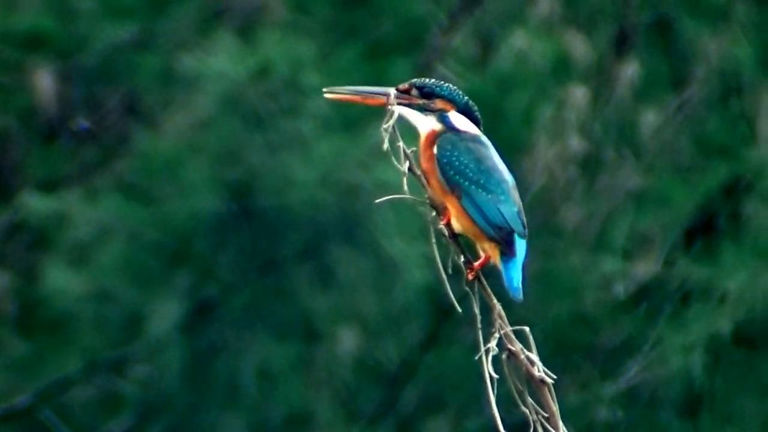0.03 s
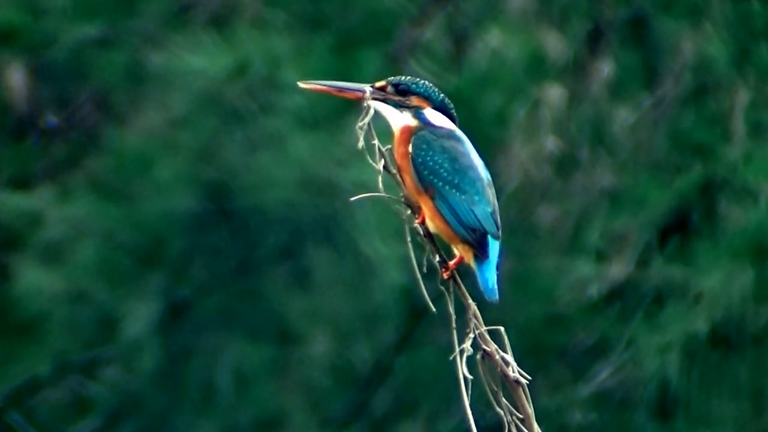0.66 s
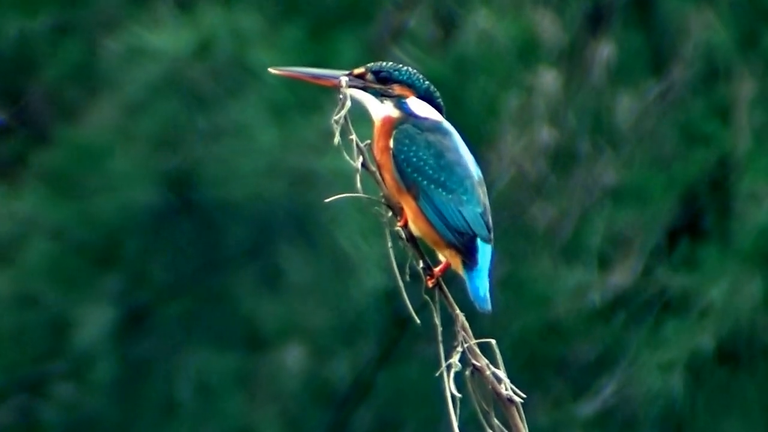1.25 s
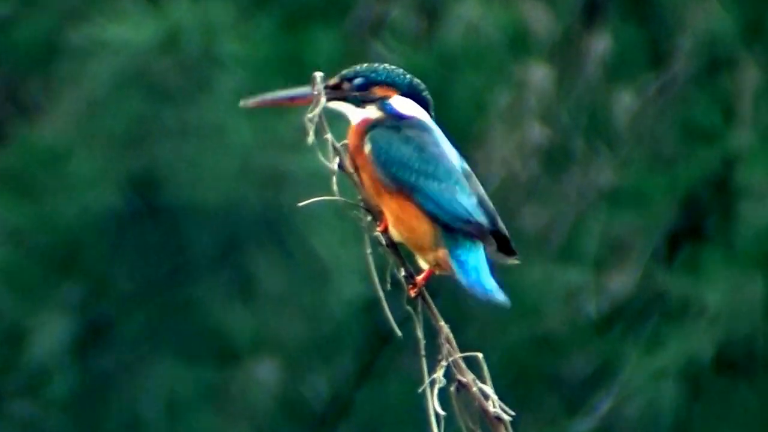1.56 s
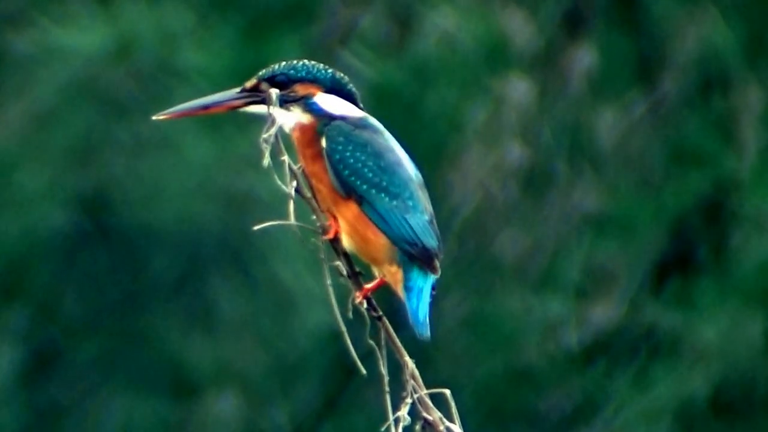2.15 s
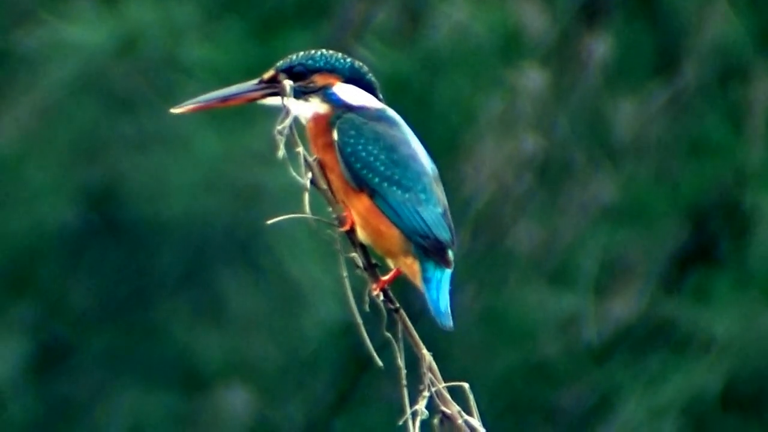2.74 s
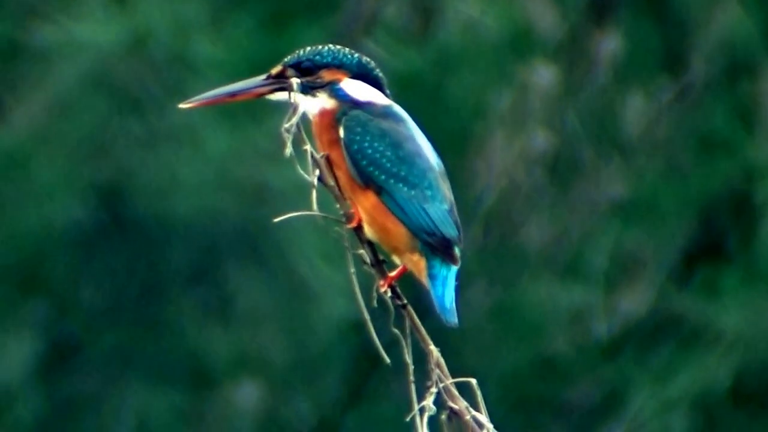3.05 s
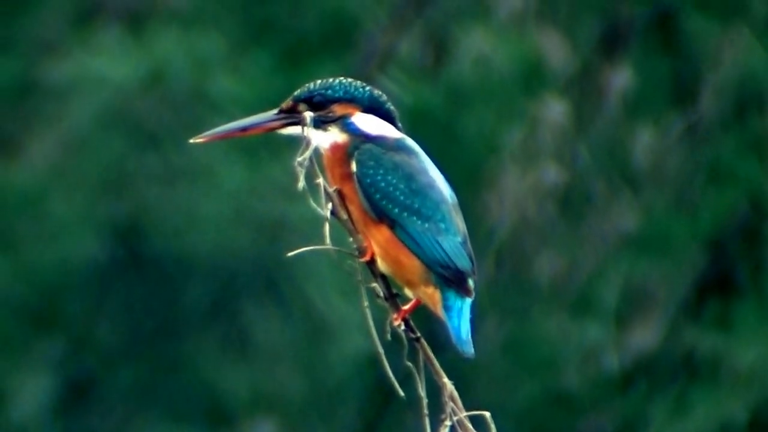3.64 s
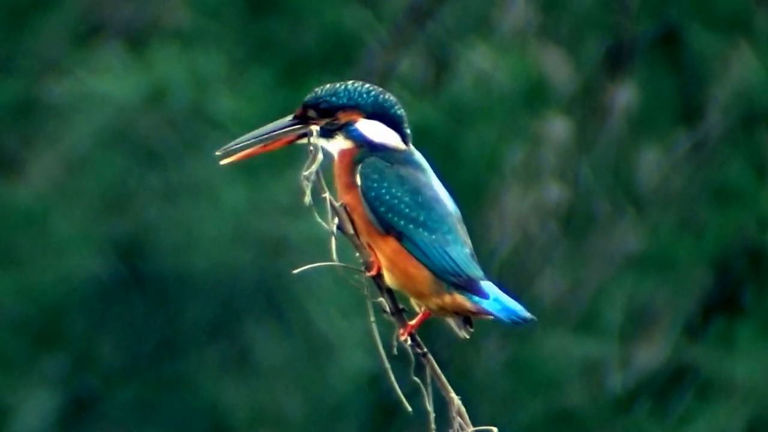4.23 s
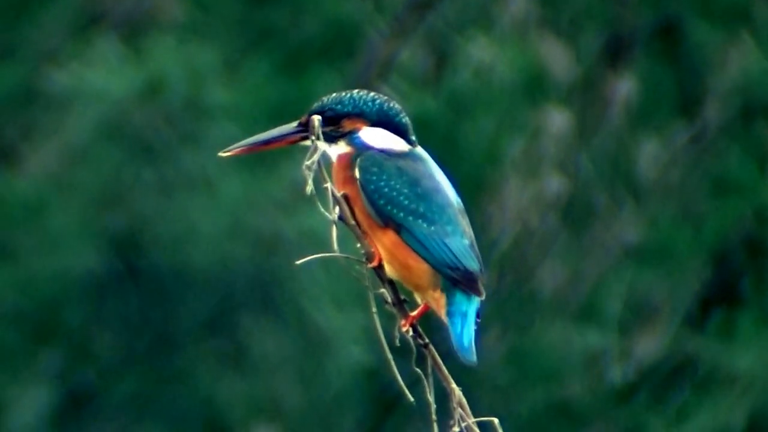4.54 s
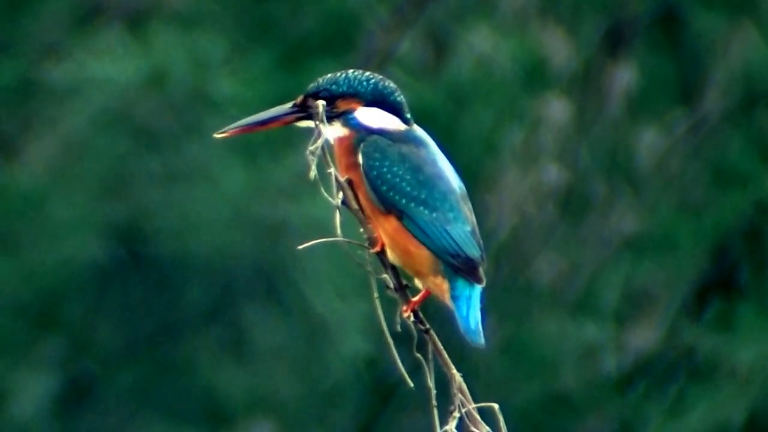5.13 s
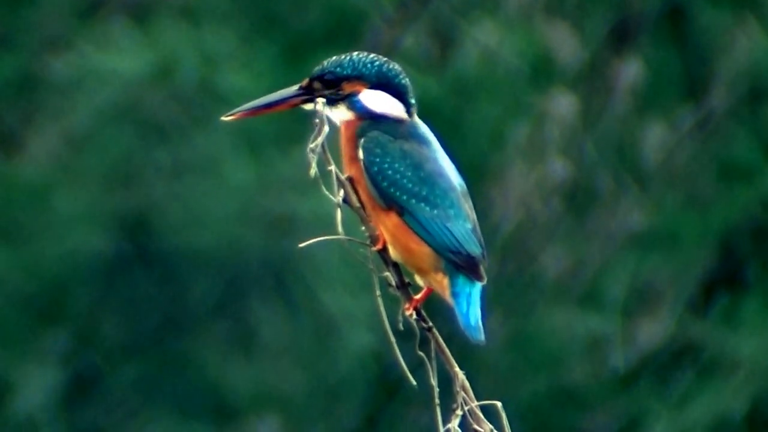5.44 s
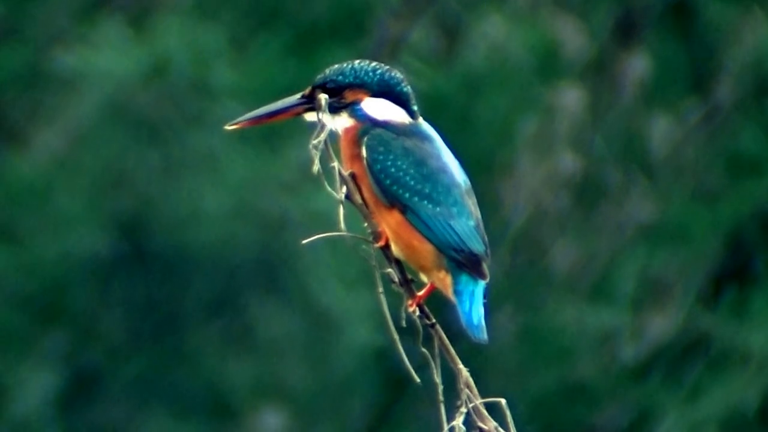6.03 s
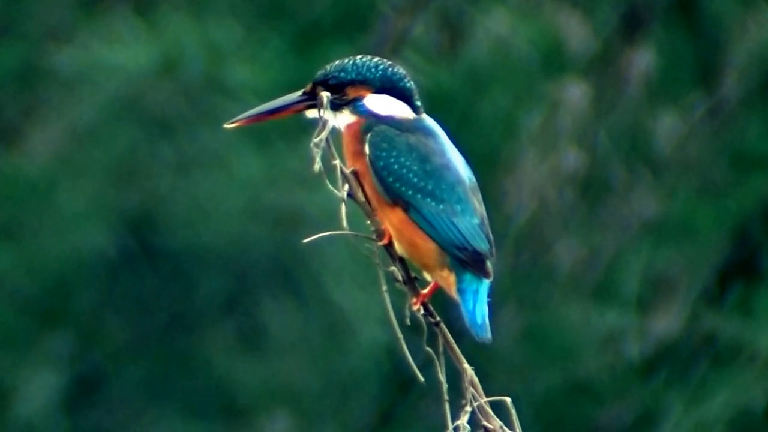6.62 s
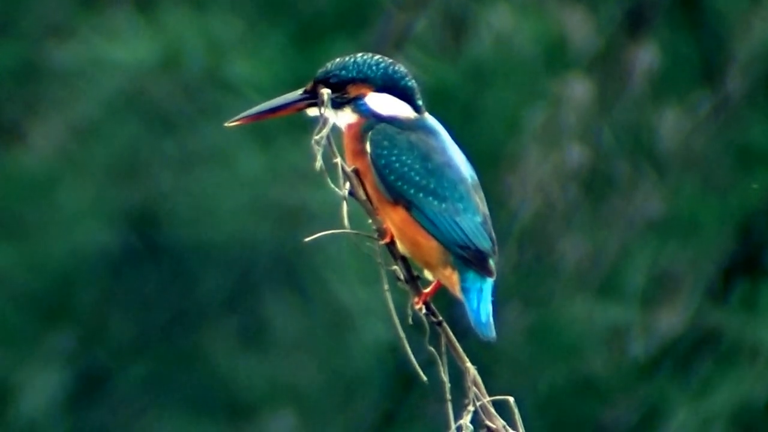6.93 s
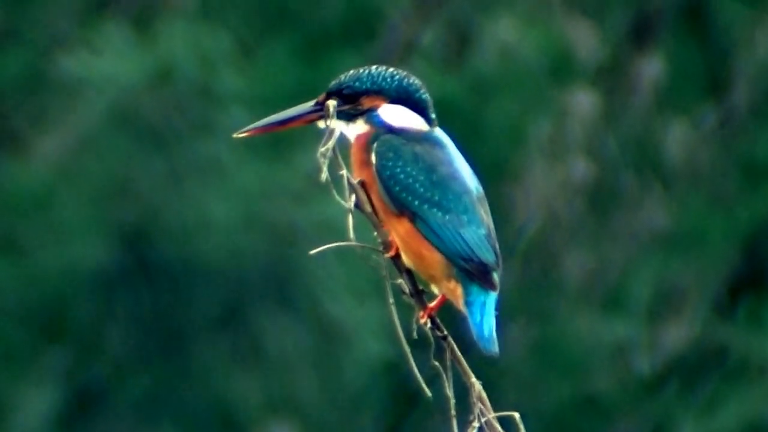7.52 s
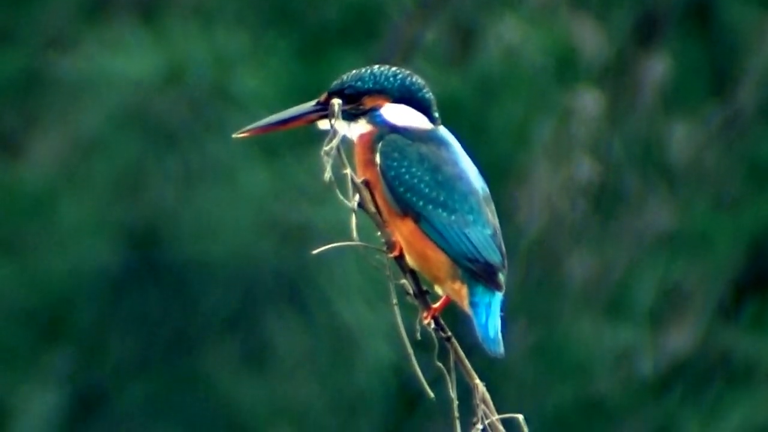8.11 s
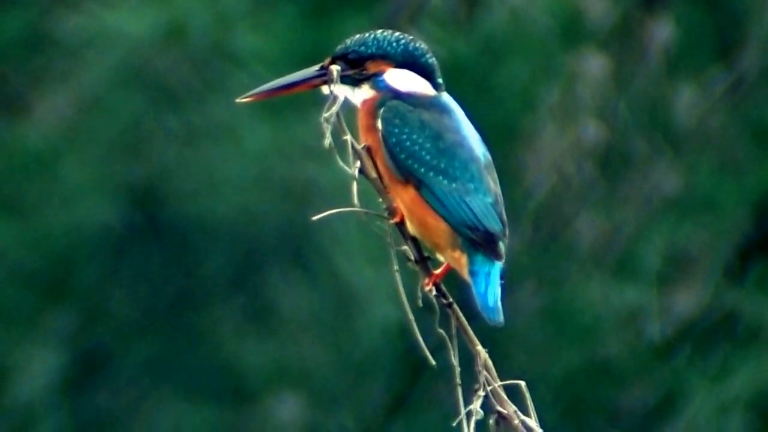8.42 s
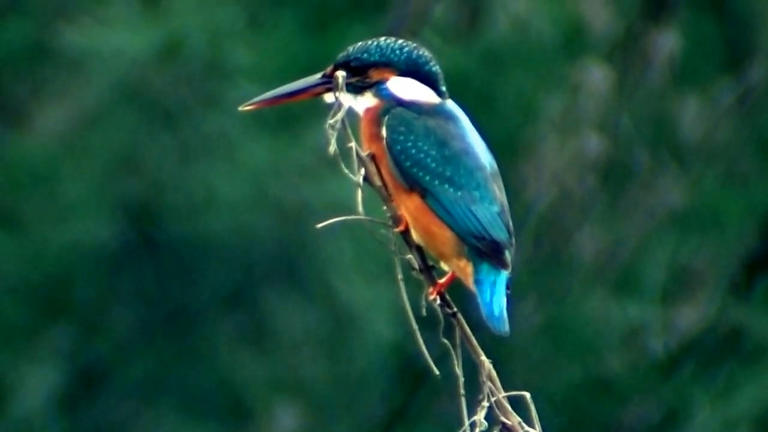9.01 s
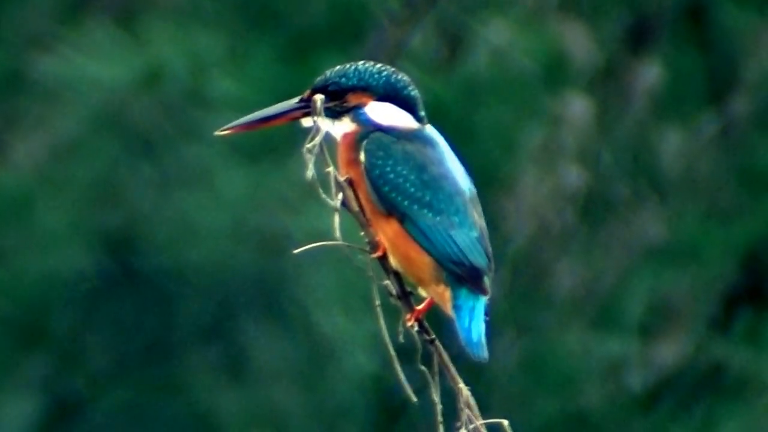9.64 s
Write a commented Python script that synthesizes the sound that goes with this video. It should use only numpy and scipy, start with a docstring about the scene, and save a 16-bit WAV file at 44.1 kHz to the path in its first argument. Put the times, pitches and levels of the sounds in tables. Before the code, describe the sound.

Outdoors at a wetland, a nearby kingfisher gives six short, shrill whistles, each falling in pitch. A second water bird pips in quick reedy pairs, and both echo off the far bank. The pips swell, then sink in pitch and die out after the last whistle. Faint distant chirps and a thin insect buzz remain, with a soft rustle near the end. Far traffic and machines hum quietly throughout.

```python
"""At a wetland's edge, distant traffic and machines hum throughout. From the start a kingfisher near
the microphone gives six shrill falling whistles, while a second water bird pips in quick reedy pairs;
the far bank throws both back. The pips swell at 2-3 s, sink in pitch and die out by 6 s, after the
last whistle. That leaves small far birds and an insect's thin wing buzz, which has been growing all
along. From 9 s a soft rustle comes up."""
import sys
import numpy as np
from scipy import signal
from scipy.fft import rfft, irfft, next_fast_len
from scipy.io import wavfile

SR = 44100
rng = np.random.default_rng(int(sys.argv[2]) if len(sys.argv) > 2 else 0)


def unload_audio(sound):
    """Save the sound as a 16-bit wav file, at the path given as the first command line argument."""
    columns = np.transpose(np.atleast_2d(sound))
    # keep every value between -1 and 1, then stretch to whole-number steps
    steps = np.round(np.clip(columns, -1, 1) * 32767)
    wavfile.write(sys.argv[1], SR, steps.astype(np.int16))


N = 430857
TIME = np.arange(N) / SR


def gain_of(db):
    """Decibels to gain."""
    return 10 ** (np.asarray(db) / 20)


def unit_rms(x):
    """Scales to rms 1."""
    return x / np.sqrt(np.mean(x ** 2) + 1e-20)


def gain_at(spectrum, hz):
    """Gain of a (frequency [Hz], level [dB]) curve, read on a log-frequency axis."""
    f, db = np.transpose(spectrum)
    return gain_of(np.interp(np.log(hz + 1), np.log(f + 1), db))


def follow(rows, at):
    """Interpolates every later column of a table along its first."""
    axis, *columns = np.transpose(rows)
    return [np.interp(at, axis, column) for column in columns]


def add(mix, start, sound):
    """Adds a sound at a start time in seconds."""
    part = mix[max(round(start * SR), 0):][:len(sound)]
    part += sound[:len(part)]


def noise(size, colour):
    """Noise of rms 1 whose spectrum is the function colour(Hz)."""
    padded = next_fast_len(size)
    spectrum = rfft(rng.standard_normal(padded)) * colour(np.fft.rfftfreq(padded, 1 / SR))
    return unit_rms(irfft(spectrum, padded)[:size])


def band(size, centre_hz, half_width_hz, order=4):
    """A band of noise; a higher order gives steeper sides."""
    return noise(size, lambda f: 1 / (1 + ((f - centre_hz) / half_width_hz) ** order))


def drift(size, hz):
    """Random wander of rms 1, up to about hz."""
    return band(size, 0, hz)


def placed(x, left_db, side=0):
    """Pans by level; a side signal, opposite in the two channels, adds width."""
    return x * gain_of([[left_db / 2], [-left_db / 2]]) + side * np.array([[1], [-1]])


def puffs(rows):
    """Narrow bursts of noise that rise quickly and trail away."""
    out = np.zeros(N)
    for start, length, db, hz, half_width in rows:
        u = np.linspace(0, 1, int(length * SR))
        burst = band(SR // 2, hz, half_width)[:len(u)] * np.sin(np.pi * np.sqrt(u)) ** 2
        add(out, start, gain_of(db) * unit_rms(burst))
    return out


# open air over the wetland: (frequency [Hz], relative level [dB])
AIR_SPECTRUM = [(15, -18), (60, 5), (340, -8), (600, -7), (780, 3), (890, -3), (980, -10), (1250, -15),
                (1900, -18), (2900, -18), (3900, -23.5), (6000, -20.5), (8600, -28), (15500, -30)]
def air():
    """A steady airy hiss, almost alike on both sides of the microphone."""
    hiss = noise(N, lambda f: gain_at(AIR_SPECTRUM, f))
    side = noise(N, lambda f: gain_at(AIR_SPECTRUM, f) * f / (f + 90) / (1 + (f / 4500) ** 4))
    return placed(gain_of(-54) * hiss, left_db=.5, side=gain_of(-70.5) * side)


# tones of far machines: (frequency [Hz], width [Hz], level [dB])
MACHINE_TONES = [(71.7, 5.1, -59.5), (772.5, 7.1, -67), (895.6, 10, -67.5), (1039, 9.7, -77),
                 (1403, 22, -74), (1546, 11, -70), (1542, 89, -66.5)]
def machines():
    """Distant hum, each tone a band of noise so narrow that it wavers."""
    return sum(gain_of(db) * band(N, hz, width / 2, order=2) for hz, width, db in MACHINE_TONES)


# distant traffic: (frequency [Hz], relative level [dB])
TRAFFIC_SPECTRUM = [(20, -40), (50, -11), (70, -3), (130, 4), (200, -4), (320, -10.5), (600, -26),
                    (2000, -48)]
# its rise and fall: (time [s], relative level [dB])
TRAFFIC_LEVEL = [(0, -53.5), (1.75, -54.5), (2.1, -50.5), (3.5, -54.5), (4.85, -51.5), (5.5, -53),
                 (6.15, -51.5), (6.4, -56.5), (7.74, -55), (7.9, -47.5), (8.3, -50.5), (9.77, -51)]
def traffic(trim_db=-1, waver_db=.7):
    """The rumble of far traffic swells and wavers, a little to the left."""
    level_db = follow(TRAFFIC_LEVEL, TIME)[0] + trim_db + waver_db * drift(N, 3.6)
    middle, side = (noise(N, lambda f: gain_at(TRAFFIC_SPECTRUM, f)) for _ in range(2))
    return gain_of(level_db) * placed(middle, left_db=2.5, side=gain_of(-22) * side)


# swells in the far rumble: (time [s], length [s], level [dB], centre [Hz], half-width [Hz])
RUMBLE_SWELLS = [(1.0, 0.16, -54, 140, 45), (4.76, 0.11, -47, 133, 35), (5.03, 0.22, -58.5, 262, 51),
                 (5.46, 0.16, -60, 282, 39.8), (9.66, 0.16, -55, 181, 40)]
def rumble_swells():
    """Brief, dull swells of low noise in the distance."""
    return puffs(RUMBLE_SWELLS)


# a late rustle: (time [s], level [dB])
RUSTLE_LEVEL = [(0, -92), (8.95, -92), (9.3, -69), (9.77, -66)]
def rustle(flutter_db=3.5):
    """A soft, uneven rustle in the middle range."""
    hiss = band(N, centre_hz=1700, half_width_hz=800, order=2)
    return hiss * gain_of(follow(RUSTLE_LEVEL, TIME)[0] + flutter_db * drift(N, 14))


# a far dry trill: (time [s], level [dB])
TRILL_LEVEL = [(0, -69), (5.9, -74.5), (6.5, -72.5), (8.2, -74.5), (9.2, -71.5), (9.77, -70)]
def trill(ticks_per_s=30):
    """Dry ticks of noise, uneven in strength."""
    cycle = np.cumsum(ticks_per_s * (1 + .01 * drift(N, 2))) / SR % 1
    strength = np.exp(-((cycle - .5) / .12) ** 2) * gain_of(1.5 * drift(N, 15))
    ticks = unit_rms(strength * band(N, centre_hz=3100, half_width_hz=900))
    return ticks * gain_of(follow(TRILL_LEVEL, TIME)[0])


# the insect warms up: (time [s], level [dB])
INSECT_LEVEL = [(0, -72), (2.1, -66), (4, -64), (6.1, -61.5), (9.77, -60)]
def insect(wing_hz=7290, sweep_hz=640, stroke_hz=108.6, back_db=-7, scrape_db=-11):
    """Each wing stroke is a tiny falling chirp, followed by a weaker back stroke."""
    cycle = np.cumsum(stroke_hz * (1 + .004 * drift(N, 16))) / SR % 1
    forward = np.exp(-((cycle - .25) / .15) ** 2)
    back = gain_of(back_db) * np.exp(-((cycle - .72) / .25) ** 2)
    hz = wing_hz + sweep_hz * (.5 - (2 * cycle) % 1) + 60 * drift(N, 196)
    tone = np.sin(2 * np.pi * np.cumsum(hz) / SR)
    scrape = gain_of(scrape_db) * band(N, wing_hz, 500, order=6)
    return unit_rms((forward + back) * (tone + scrape)) * gain_of(follow(INSECT_LEVEL, TIME)[0])


def twitters(from_s=5.5, every_s=.39, length_s=.22, db=-75.5, hz=5300, half_width_hz=500):
    """Nine faint, high twitters far off, at loose intervals as the pips die out."""
    starts = from_s + every_s * (np.arange(9) + rng.uniform(-.5, .5, 9))
    centres = hz + rng.uniform(-300, 300, 9)
    return puffs([(start, length_s, db, centre, half_width_hz) for start, centre in zip(starts, centres)])


# far birds' chips: (time [s], length [s], level [dB], centre [Hz], half-width [Hz])
CHIPS = [(4.71, .1, -61, 3350, 300), (6.08, .2, -74, 4950, 250), (6.478, 0.013, -57, 2890, 700),
         (7.38, .22, -69.5, 5450, 600), (7.777, .018, -61, 5130, 400), (8.523, 0.018, -59, 4260, 300),
         (8.595, 0.027, -57, 4930, 700), (8.98, .18, -68.5, 5070, 220), (9.23, .3, -67.5, 6000, 450)]
def chips():
    """Raspy calls, each a narrow burst of noise."""
    return puffs(CHIPS)


def slur(length, start_hz, warble, fall_hz_per_s=5800, scatter=.008):
    """A thin note that bends downward; warble and scatter are shares of its pitch."""
    u = np.linspace(0, 1, int(length * SR))
    glide_hz = start_hz - fall_hz_per_s * length * u ** 1.4
    hz = glide_hz * (1 + scatter * rng.uniform(-1.03, 1) + warble * drift(len(u), 210))
    return unit_rms(np.sin(2 * np.pi * np.cumsum(hz) / SR) * signal.windows.tukey(len(u), .3))


# a small far bird's phrases: (time [s], level [dB])
PHRASES = [(6.252, -66.5), (6.628, -65), (6.944, -61.5), (7.27, -64), (7.58, -64), (7.894, -63),
           (8.455, -63), (8.872, -67.5), (9.22, -63), (9.648, -65.5)]
# the notes of each: (delay [s], length [s], relative level [dB], start pitch [Hz])
PHRASE_NOTES = [(0, 0.05, 0, 4370), (0.094, 0.069, -5, 3510)]
def two_note_bird():
    """One phrase repeated: a high slur, then a softer low one."""
    out = np.zeros(N)
    for start, db in PHRASES:
        for delay, length, note_db, hz in PHRASE_NOTES:
            add(out, start + delay, gain_of(db + note_db) * slur(length, hz, warble=.0079))
    return out


# another far bird: (time [s], length [s], level [dB], start pitch [Hz])
HOARSE_NOTES = [(5.588, 0.078, -61, 3750), (5.716, .033, -59, 3260), (6.334, .1, -64, 3240),
                (6.934, .07, -60, 3195), (8.553, 0.068, -64, 3180)]
def hoarse_bird():
    """Falling notes, roughened by a fast warble."""
    out = np.zeros(N)
    for start, length, db, hz in HOARSE_NOTES:
        add(out, start, gain_of(db) * slur(length, hz, warble=.032))
    return out


# echo of near reeds and the far bank: (delay [s], relative level [dB])
ECHO_DECAY = [(.004, -9), (.02, 0), (.045, -3), (.06, -14), (.098, -17), (.108, -3), (.135, -6), (.2, -14),
              (.3, -22), (.5, -32), (1.1, -65)]
# its colour: (frequency [Hz], gain [dB])
ECHO_SPECTRUM = [(500, 8.5), (1150, -2), (2200, -12), (2800, -3.5), (3350, -0.5), (4200, -3.5), (5150, -5),
                 (5700, 0), (6500, -1.5), (8500, -11), (12000, -11)]
def bank_echo(x, spread=.15):
    """Scattered reflections: a few from reeds by the microphone, then a cluster from the far bank."""
    t = np.arange(SR) / SR
    taps_per_s = 500 + 6000 * t
    taps = rng.choice([-1., 1.], (2, SR)) * (rng.random((2, SR)) < taps_per_s / SR)
    taps *= gain_of(follow(ECHO_DECAY, t)[0])
    taps /= np.linalg.norm(taps, axis=1, keepdims=True)
    middle, side = irfft(rfft(taps) * gain_at(ECHO_SPECTRUM, np.fft.rfftfreq(SR, 1 / SR)))
    response = placed(middle, left_db=0, side=spread * side)
    return signal.fftconvolve(x[None], response, axes=1)[:, :N]


# strong single reflections off water, reeds and the far bank: (delay [s], gain [dB])
REFLECTIONS = [(.012, -12), (.0176, -16), (.025, -15), (.106, -15), (.1145, -20), (.134, -22)]
def slaps(x):
    """Distinct delayed copies, which beat against a gliding call at the microphone."""
    out = np.zeros(N)
    for delay, db in REFLECTIONS:
        add(out, delay, gain_of(db) * x)
    return out


# course of a pip: (share of length [0-1], level [dB], pitch [factor], roughness [0-1])
PIP_COURSE = [(0, -10, 1, .2), (.14, -1, 1, .05), (.42, .5, 1, .03), (.66, 0, 1, .08), (.76, -5, .99, .35),
              (.83, -3, .83, .35), (.92, -12, .8, .4), (1, -26, .78, .4)]
# the water bird's throat: (frequency [Hz], relative level [dB])
THROAT_SPECTRUM = [(600, -24), (950, -11.5), (1200, -17.5), (1550, -15.5), (1900, 4), (2070, -1.5),
                   (2300, 5.5), (2600, -2.5), (2850, -0.5), (3150, -15.5), (3450, -14), (3850, -55),
                   (4400, -34.5), (5300, -25.5), (6200, -40), (7100, -27.5), (7700, -45), (8450, -27),
                   (9300, -42), (11500, -50), (15000, -66)]
# the rasp in its voice: (frequency [Hz], relative level [dB])
RASP_SPECTRUM = [(700, -9), (2700, -2), (3900, -10.5), (5500, -5.5), (9000, -26), (10500, -18),
                 (12000, -24), (15000, -34)]
def pip(length, db, top_hz, bright_db, jitter=.048, rasp=.51, arch_width_s=.0547):
    """Reedy pulses through a throat that favours harmonics 2 and 3, ending in a rough downward flick."""
    u = np.linspace(0, 1, int(length * SR))
    shape_db, flick, rough = follow(PIP_COURSE, u)
    rough += np.interp(db, [-44, -34], [.3, 0])  # soft pips are less firmly voiced
    # a long pip climbs to the top of the pitch arch; a short one catches only the fall
    from_top_s = (u - .62) * length + .00905
    arch_hz = top_hz * np.exp(-(from_top_s / arch_width_s) ** 2)
    hz = arch_hz * flick * (1 + jitter * np.sqrt(rough) * drift(len(u), 1050))
    harmonic = np.arange(1, 15)[:, None]
    # the upper harmonics come and go within a pip
    flutter_db = np.where(harmonic > 3, 5, 1.5) * np.array([drift(4096, 51)[:len(u)] for _ in harmonic])
    heights = gain_at(THROAT_SPECTRUM, harmonic * hz) * gain_of(bright_db * (harmonic > 2) + flutter_db)
    turns = harmonic * np.cumsum(hz) / SR + rng.random(harmonic.shape)
    voice = unit_rms((heights * np.cos(2 * np.pi * turns)).sum(0) / np.linalg.norm(heights, axis=0))
    hiss = rasp * rough * noise(len(u), lambda f: gain_at(RASP_SPECTRUM, f))
    return (voice + hiss) * gain_of(db + shape_db) * signal.windows.tukey(len(u), .12)


# pips, mostly a strong one and a weaker answer:
# (time [s], length [s], level [dB], top pitch [Hz], lift above the second harmonic [dB])
PIP_CALLS = [(.025, .03, -40.5, 947, 3), (.135, .02, -44.5, 994, 11), (0.362, .024, -37, 1133, 9),
             (.464, 0.023, -41, 1083, 12), (.671, 0.028, -41.5, 1053, 7), (0.792, 0.023, -43.5, 1117, 9.5),
             (1.01, 0.041, -44.5, 1055, 5.5), (1.14, 0.013, -43, 965, -15.5), (1.335, .012, -46, 968, -1.5),
             (1.521, 0.045, -46.5, 1100, 6.5), (1.62, 0.027, -41.5, 1112, -10),
             (1.826, .04, -30.5, 1190, 8.5), (1.941, 0.032, -29, 1173, 5), (2.132, 0.042, -26, 1217, 11.5),
             (2.228, 0.024, -25.5, 1159, 8.5), (2.407, 0.042, -25, 1198, 11.5),
             (2.507, 0.019, -33.5, 1065, 2), (2.69, 0.041, -24, 1190, 10.5), (2.779, 0.028, -33, 1089, 4.5),
             (2.978, 0.033, -24.5, 1187, 10), (3.07, 0.025, -30, 1114, 4), (3.286, .024, -30, 1110, 5.5),
             (3.377, .018, -34.5, 1014, 2.5), (3.573, .034, -29.5, 1115, 6.5),
             (3.667, 0.02, -34.5, 1010, 2.5), (3.867, .035, -32.5, 1077, 10), (3.961, 0.021, -34.5, 982, 0),
             (4.187, 0.023, -32.5, 992, 8), (4.279, 0.021, -33.5, 985, 4.5), (4.514, .026, -33.5, 988, 3.5),
             (4.612, 0.022, -35.5, 946, -3.5), (4.846, 0.03, -33, 990, 5.5), (5.006, .012, -39, 932, -3),
             (5.433, 0.019, -38.5, 909, -6), (5.571, 0.022, -34, 955, 2), (5.85, 0.015, -39.5, 907, -3),
             (5.997, .0075, -44, 835, -11)]
# the bird faces away from the microphone at first, so more arrives as echo: (time [s], echo gain [dB])
FACING_AWAY = [(0, 3.5), (1.6, 9.5), (1.8, -0.5), (3, -3.5), (3.3, 1.5), (6, -9)]
def water_bird(squeak_db=-21):
    """Pips and their echoes, each led by a tiny rising squeak as the voice catches."""
    t = np.arange(int(.0079 * SR)) / SR
    squeak = unit_rms(signal.chirp(t, f0=2572.4, t1=t[-1], f1=3436.75) * np.hanning(len(t)))
    direct = np.zeros(N)
    for start, length, db, top_hz, bright_db in PIP_CALLS:
        add(direct, start, pip(length, db, top_hz, bright_db))
        add(direct, start - .007, gain_of(db + squeak_db) * squeak)
    thrown = direct * gain_of(follow(FACING_AWAY, TIME)[0])
    return direct + gain_of(-9.5) * slaps(thrown) + gain_of(-3.5) * bank_echo(thrown)


# whistles: (start [s], end [s], level [dB], top pitch [Hz], low pitch [Hz], hold of the top [exponent])
KINGFISHER_CALLS = [(0.086, 0.174, -27.5, 5830, 4960, 1.01), (.634, 0.724, -28.5, 5777, 4930, 0.93),
                    (1.408, 1.496, -28.5, 5730, 4870, 0.99), (1.839, 1.928, -28.5, 5650, 5010, 1.13),
                    (2.609, 2.69, -27, 5754, 5030, 1.05), (4.332, 4.412, -32.5, 5635, 4750, 0.93)]
# course of a whistle: (share of length [0-1], pitch fall [0 top, 1 low], level [dB])
WHISTLE_COURSE = [(0, .55, -7), (.05, .1, -2), (.12, 0, -.5), (.33, .11, 1.5), (.57, .45, 0), (.8, .76, -4),
                  (.95, .95, -8), (1, 1.12, -17)]
def kingfisher(second_db=-28, third_db=-40, waver=.0029):
    """A near-pure tone snaps up to its top, slides down and echoes across the water."""
    direct = np.zeros(N)
    for start, end, db, top_hz, low_hz, hold in KINGFISHER_CALLS:
        u = np.linspace(0, 1, int((end - start) * SR))
        fall, shape_db = follow(WHISTLE_COURSE, u ** hold)
        hz = (top_hz + (low_hz - top_hz) * fall) * (1 + waver * drift(len(u), 440))
        phase = 2 * np.pi * np.cumsum(hz) / SR
        overtones = gain_of(second_db) * np.sin(2 * phase) + gain_of(third_db) * np.sin(3 * phase)
        overtones *= gain_of(3.2 * drift(len(u), 230) - 8.2 * fall)  # flickering, strongest at the top
        envelope = gain_of(db + shape_db) * signal.windows.tukey(len(u), .05)
        add(direct, start, np.sqrt(2) * (np.sin(phase) + overtones) * envelope)
    return direct + slaps(direct) + gain_of(-10) * bank_echo(direct)


def scene():
    """The wetland from the microphone: two birds left of centre, in front of the distant sounds."""
    near = placed(kingfisher(), left_db=1.3) + placed(water_bird(), left_db=3.5)
    far_birds = twitters() + chips() + two_note_bird() + hoarse_bird()
    far = far_birds + gain_of(-7) * bank_echo(far_birds) + trill() + rustle() + rumble_swells()
    background = air() + placed(machines(), left_db=.5) + traffic()
    return background + placed(far, left_db=1.5) + placed(insect(), left_db=1) + near


def record(dry, edge_hz=15800):
    """The recorder's band limit."""
    lowpass = signal.firwin(511, edge_hz, window=("kaiser", 9), fs=SR)
    return signal.oaconvolve(dry, lowpass[None], "same")


dry = scene()
out = record(dry)
unload_audio(out)
```